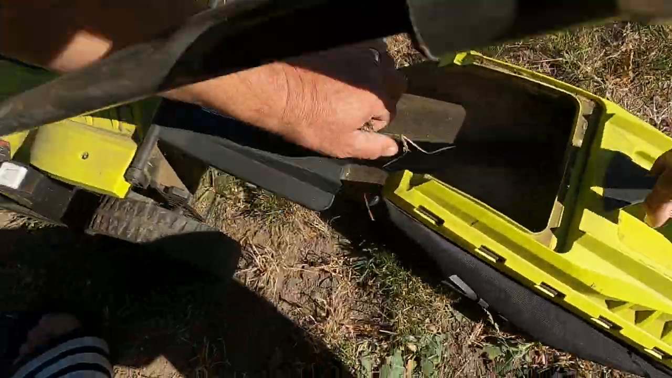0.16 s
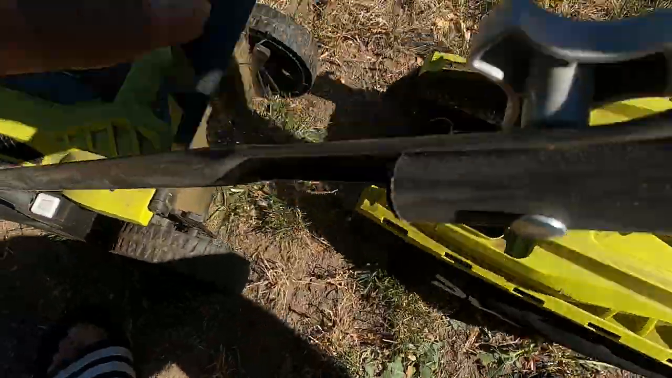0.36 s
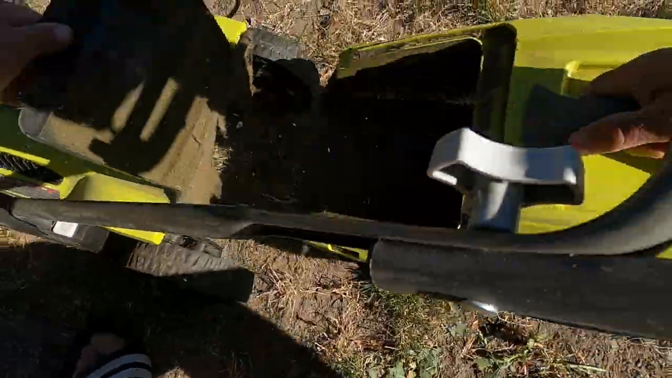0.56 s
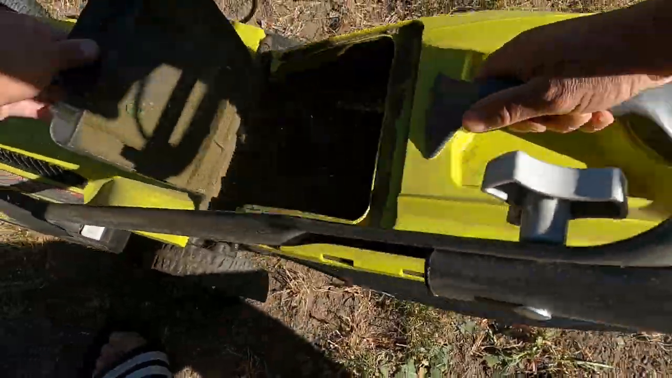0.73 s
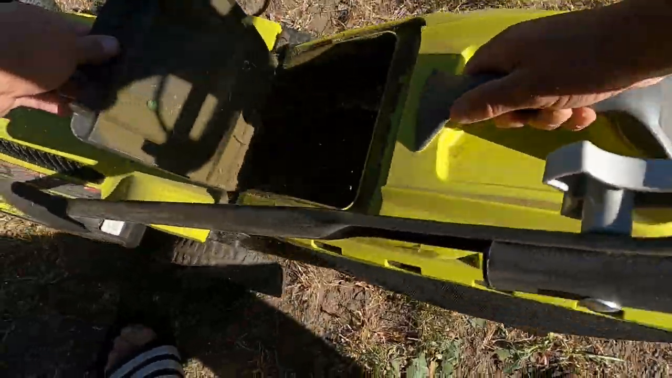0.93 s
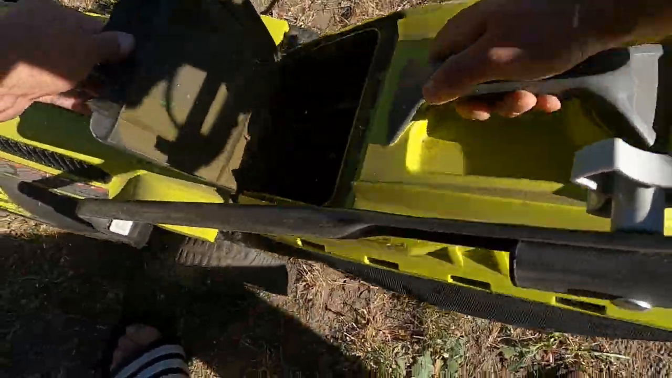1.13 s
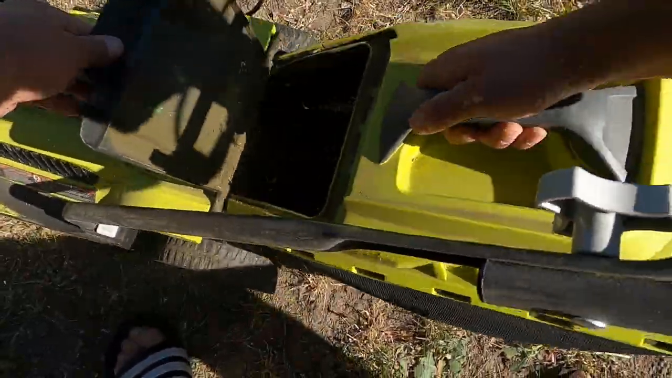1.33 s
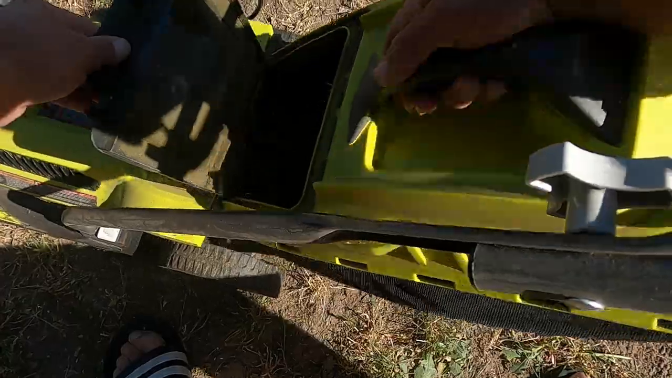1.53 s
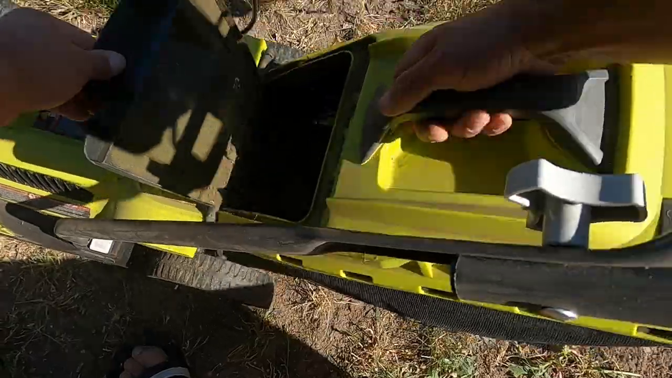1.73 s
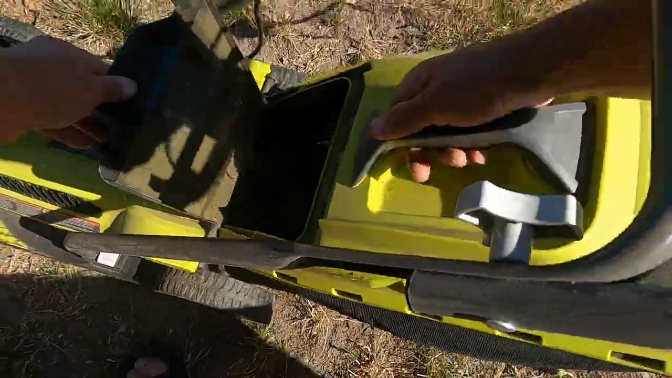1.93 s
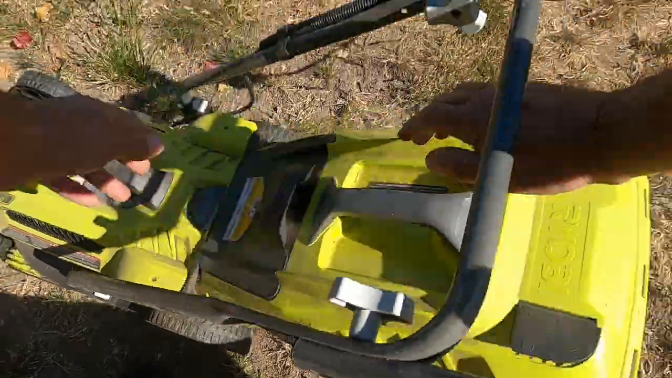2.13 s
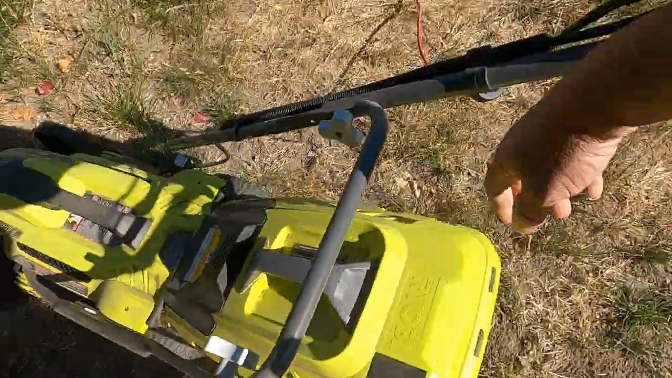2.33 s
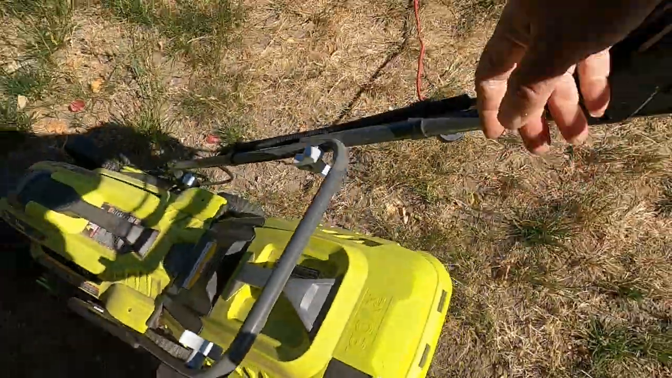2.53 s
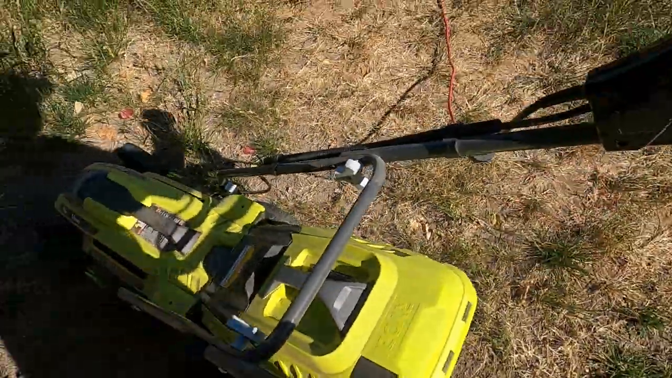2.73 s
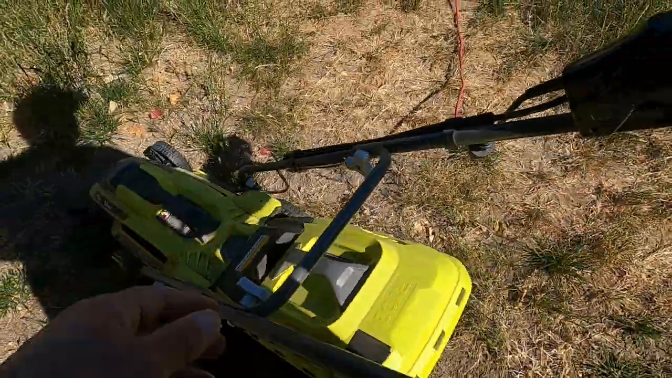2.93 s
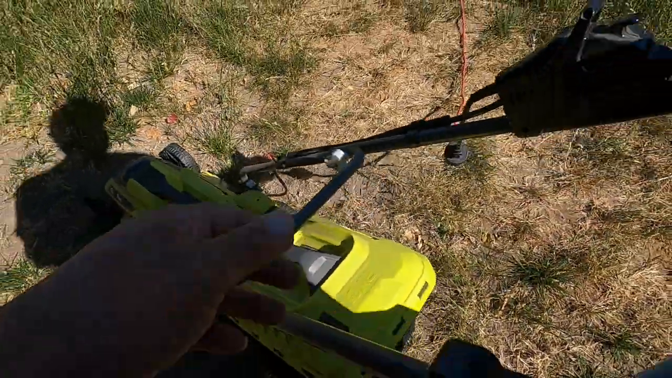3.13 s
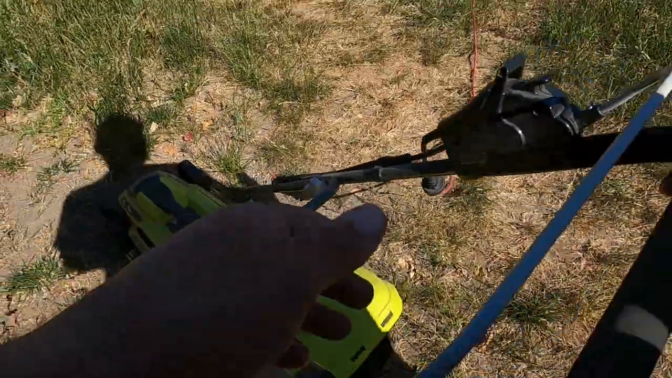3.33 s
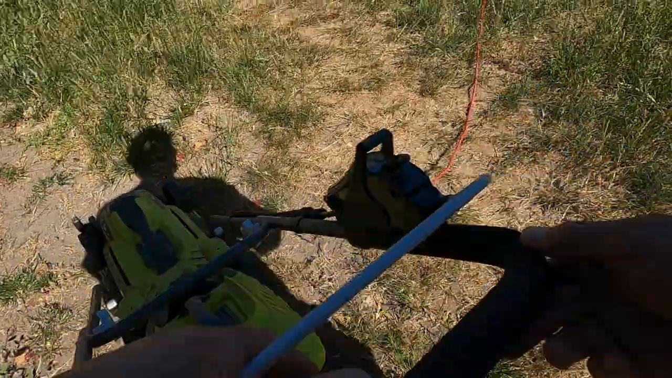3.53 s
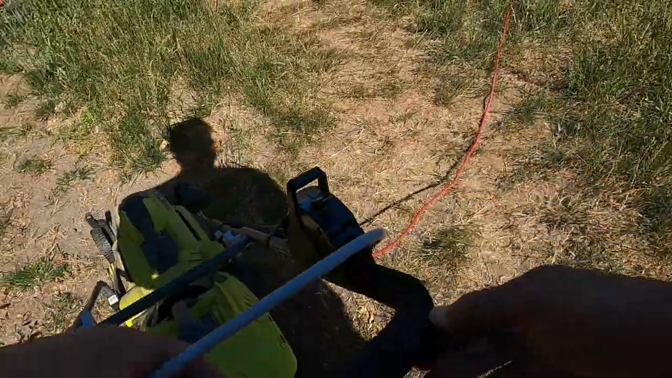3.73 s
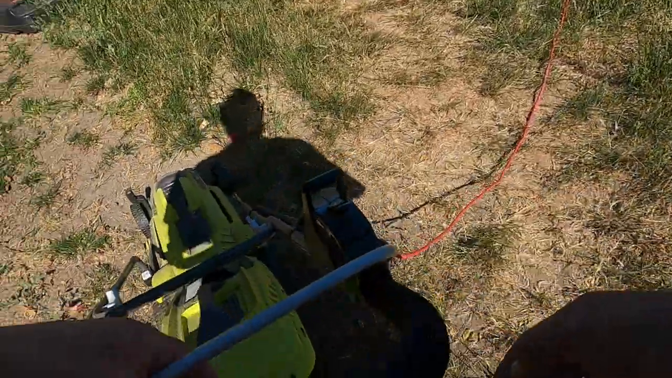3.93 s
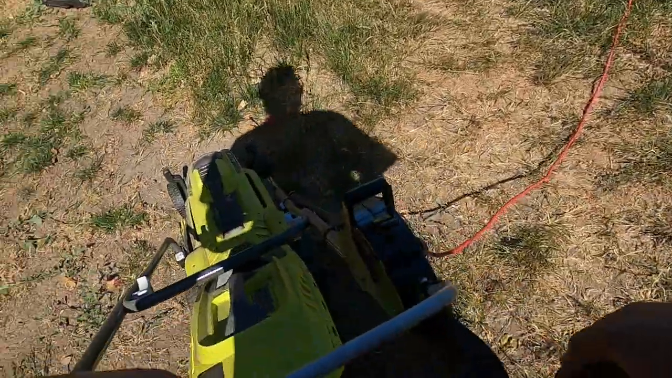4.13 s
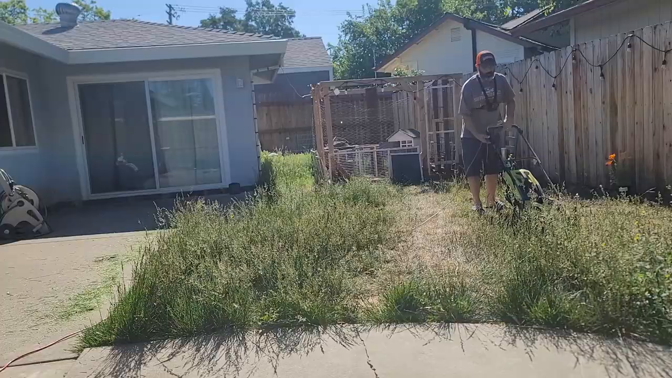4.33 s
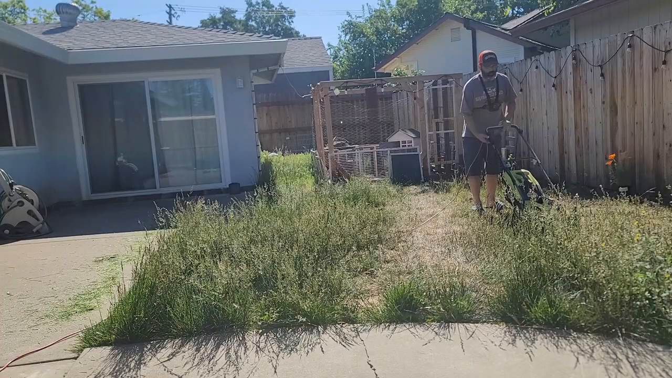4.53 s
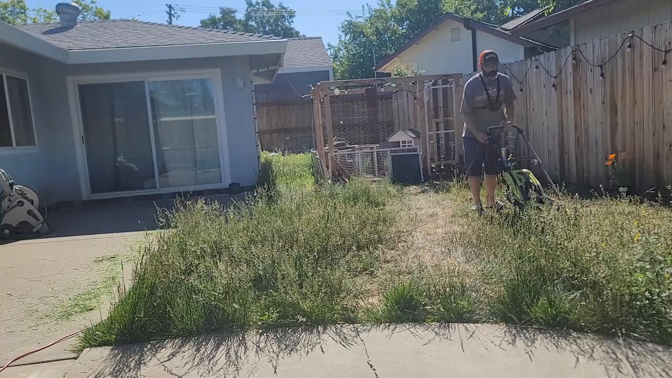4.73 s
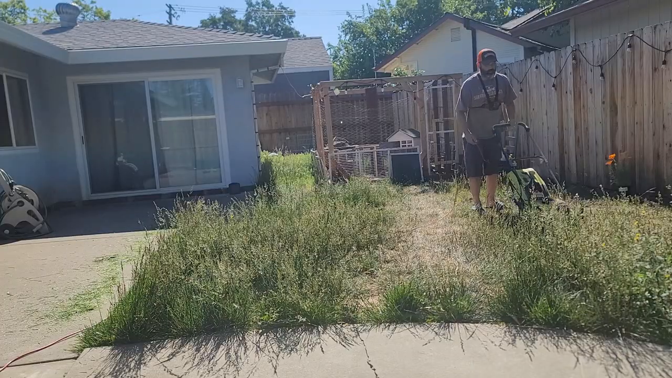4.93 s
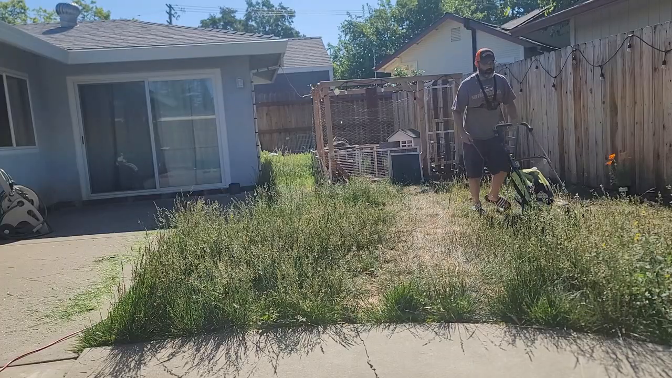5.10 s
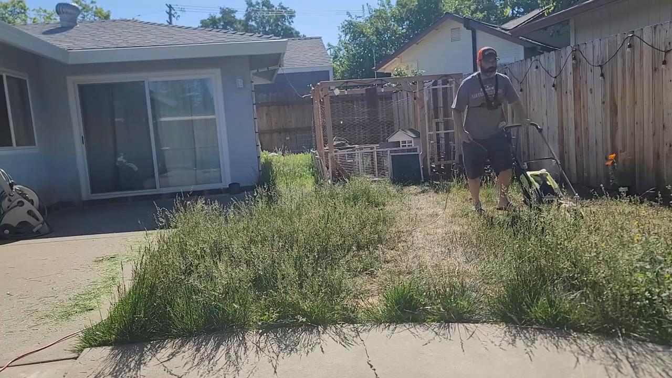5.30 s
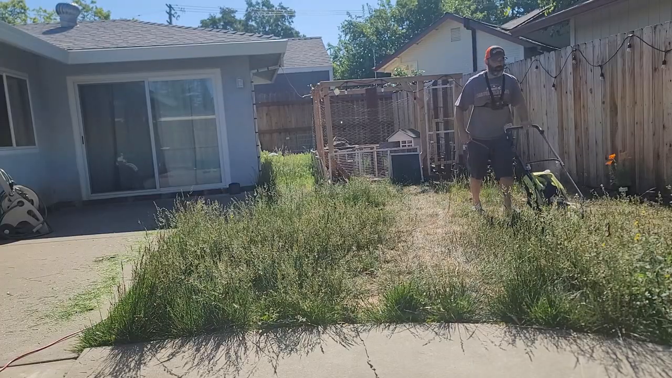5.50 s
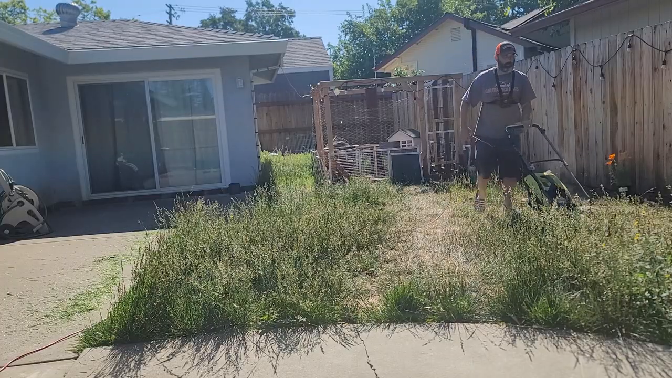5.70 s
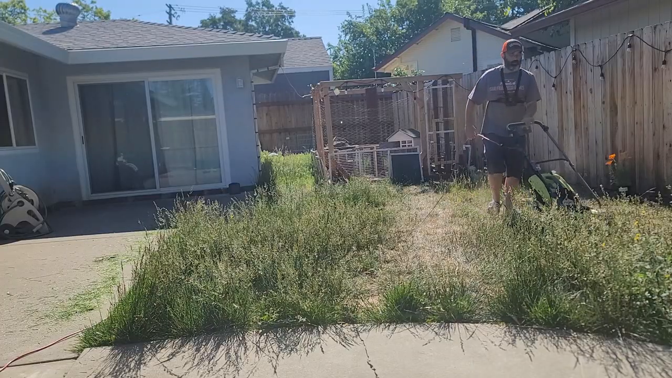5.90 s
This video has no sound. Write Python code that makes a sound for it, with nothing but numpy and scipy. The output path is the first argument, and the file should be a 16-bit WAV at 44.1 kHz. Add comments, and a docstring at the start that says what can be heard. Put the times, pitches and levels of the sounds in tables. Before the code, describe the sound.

A plastic grass catcher rubs, clatters and snaps into place before an electric mower spins up and runs with a rushing hum.

```python
"""In a backyard a hollow plastic grass catcher is dragged over dry grass and knocked into an electric mower:
impacts excite its wall modes, friction rubs and rustles, and moving air and the heaviest knock rumble at the
camera. At 2.2 s the flap squeaks and slaps shut; a hand slides along the handle and pulls the switch. From 4.3
s the motor whines up to speed and the blade hums, pushing air once per pass; at 5.3 s it meets tall grass and
the hiss grows. Throughout, a fence and a house wall weakly reflect the knocks."""
import sys
import numpy as np
from scipy import signal
from scipy.fft import rfft, irfft, next_fast_len
from scipy.io import wavfile
from scipy.ndimage import map_coordinates

SR = 44100
rng = np.random.default_rng(int(sys.argv[2]) if len(sys.argv) > 2 else 0)


def dump_mix(stems):
    """Bounce the given channels to the path in sys.argv[1] as a 16-bit WAV at rate SR."""
    frames = np.atleast_2d(stems).T  # one column per channel
    limited = np.clip(frames, -1, 1)  # hard clip at full scale
    pcm = np.round(limited * 32767).astype(np.int16)
    wavfile.write(sys.argv[1], SR, pcm)


N = 262836
FULL_HZ = 108.8  # blade-passing frequency at full speed

# left-right coherence of near and far sources: f/Hz, coherence (clipped to 0-1 in use)
NEAR = [(60, 0.96), (180, 1), (550, 0.93), (1650, 0.69), (4970, 0.54), (15000, 0.031)]
FAR = [(60, 0.99), (130, 0.95), (290, 0.95), (640, 0.71), (1410, 0.66), (3100, 0.33), (6820, 0.15),
       (15000, -1.4)]


def amp(db):
    """Amplitude ratio of a level."""
    return 10 ** (np.asarray(db) / 20)


def unit(x):
    """Normalisation to rms 1."""
    return x / np.sqrt(np.mean(x ** 2) + 1e-20)


def along(points, hz):
    """Interpolation on a logarithmic frequency axis."""
    f, v = np.transpose(points)
    return np.interp(np.log(hz + 1), np.log(f + 1), v)


def wobble(rate):
    """Smooth random modulation, rate knots a second."""
    return map_coordinates(rng.standard_normal(8192), [np.arange(N) * rate / SR], mode="wrap")


def filtered(x, response):
    """Linear filtering: the spectrum times a frequency response."""
    n = x.shape[-1]
    m = next_fast_len(n + 8192)
    return irfft(rfft(x, m) * response(np.fft.rfftfreq(m, 1 / SR)), m)[..., :n]


def resonances(modes, f):
    """Superposed damped resonators of alternating sign."""
    return sum((-1) ** k * amp(db) * 1j * f * width / (centre ** 2 - f * f + 1j * f * width)
               for k, (centre, width, db) in enumerate(modes))


def spread(pair, coherence):
    """Mid-side mixing gives two independent signals a set coherence."""
    turn = lambda f: np.arccos(np.clip(along(coherence, f), 0, 1)) / 2
    mid, side = filtered(pair, lambda f: np.array([np.cos(turn(f)), np.sin(turn(f))]))
    return np.array([mid + side, mid - side])


def noise(spectrum, coherence, grain_db=0, grain_rate=500):
    """Coloured stereo noise of rms 1, amplitude-modulated into grains."""
    white = rng.standard_normal((2, N)) * amp(grain_db * wobble(grain_rate))
    ends = lambda f: 1 / (1 + (f / spectrum[-1][0] / 2) ** 4) / (1 + (spectrum[0][0] / 2 / (f + 1)) ** 4)
    return unit(spread(filtered(white, lambda f: amp(along(spectrum, f)) * ends(f)), coherence))


def blow(x, db):
    """Equal energy: a transient is scaled to match db held for 10 ms."""
    energy = np.sum(np.atleast_2d(x) ** 2, axis=1).mean()
    return x * amp(db) * np.sqrt(.01 * SR / (energy + 1e-20))


def fade(t, t60):
    """Exponential decay by 60 dB in t60."""
    return np.exp(-np.log(1000) * t / max(t60, 1e-3))


def stroke(start, length, rise, t60):
    """Envelope of a movement: Gaussian rise, hold, exponential decay."""
    t = np.arange(N) / SR - start
    return np.exp(-(np.minimum(t, 0) / rise) ** 2) * fade(np.maximum(t - length, 0), t60)


def add(out, s, sound):
    """Superpose a short sound on out at s seconds."""
    part = out[:, max(0, round(s * SR)):][:, :sound.shape[-1]]
    part += sound[..., :part.shape[1]]


def background(drone_hz=539):
    """Ambient noise: quiet outdoor air, joined by a faint far-off drone."""
    # outdoor air spectrum: f/Hz, relative level/dB
    air = [(15, -26), (25, -2), (158, -5), (415, -16), (529, -12.5), (588, -17), (2560, -26.5), (8780, -80),
           (15000, -80)]
    t = np.arange(N) / SR
    drone = np.sin(2 * np.pi * drone_hz * t + .5 * wobble(12)) * np.interp(t, [3.45, 3.7], [0, 1])
    return amp(-47.5) * noise(air, NEAR) + amp(-53) * drone


def handling(rest_db=-64):
    """Friction noise: the box rubs and scrapes, dry stalks crackle and palms brush the handle."""
    # pushes of the catcher: t/s, duration/s, relative rub level/dB, relative rustle level/dB
    slides = [(0, 0.43, -43, -53), (0.357, .03, -35.5, -47), (.415, 0.024, -36.5, -42),
              (0.473, .12, -32.5, -48.5), (0.864, 0.19, -35.5, -60.5), (1.097, 0.092, -32.5, -53),
              (1.314, 0.052, -33, -54.5), (1.552, 0.02, -31, -48.5), (1.675, 0.14, -37.5, -56.5),
              (2.027, 0.32, -39, -51)]
    # palm strokes: t/s, duration/s, relative level/dB
    brushes = [(2.884, 0.01, -52), (2.961, .01, -53), (3.055, 0.12, -52.5), (3.478, 0.07, -50.5),
               (3.656, 0.1, -55), (4.094, 0.027, -40.5)]
    # spectra of the hollow box and dry grass: f/Hz, relative level/dB
    hollow = [(70, -10.5), (160, -7), (350, -5.5), (500, -10), (700, -20), (1200, -27.5)]
    straw = [(650, 5), (1300, 4), (2200, 0), (3300, -2.5), (5000, -4), (8500, -10.5), (12000, -21.5),
             (16000, -32.5)]
    # resonances of plastic scraping on plastic: f/Hz, bandwidth/Hz, gain/dB
    edge_modes = [(917, 160, 2.5), (2520, 130, -10), (2700, 220, 3), (3570, 400, 4.5)]
    rubbing, sliding, brushing = 0, 0, amp(rest_db)
    for start, length, rub_db, rustle_db in slides:
        push = stroke(start, length, rise=.03, t60=.56)
        rubbing = np.maximum(rubbing, amp(rub_db) * push)
        sliding = np.maximum(sliding, amp(rustle_db) * push)
    for start, length, rustle_db in brushes:
        brushing = np.maximum(brushing, amp(rustle_db) * stroke(start, length, rise=.03, t60=.22))
    rub = amp(-1) * noise(hollow, NEAR, grain_db=2.5, grain_rate=120)
    friction = noise(straw, NEAR, grain_db=5, grain_rate=150)
    scrape = amp(2) * unit(filtered(friction, lambda f: resonances(edge_modes, f)))
    brush = amp(2) * noise(straw, NEAR, grain_db=1.5, grain_rate=250)
    crackle = amp(-2) * noise(straw[2:], NEAR, grain_db=8, grain_rate=500)
    return rubbing * rub + sliding * scrape + np.maximum(sliding, brushing) * (brush + crackle)


def buffet():
    """Low rumbles reach the two microphone ports unequally: pressure fluctuations of moving air, and the low
    thump of the heavy knock at 0.82 s."""
    # low rumbles at the ports (moving air; at 0.824 s the knock's low thump): t/s, duration/s, relative
    # level/dB, left minus right/dB
    rumbles = [(0, 0.5, -47, -1), (0.824, 0.043, -25, -0.5), (1.1, 0.08, -29, -1), (1.554, .07, -35, 0),
               (2.246, 0.21, -38.5, -22), (2.515, 0.34, -45, 10.5), (3.599, 0.029, -28.5, -17)]
    gusts = sum(amp(db + np.array([[pan_db], [-pan_db]]) / 2) * stroke(start, length, rise=.018, t60=.43)
                for start, length, db, pan_db in rumbles)
    spectrum = [(18, -4), (35, 0), (70, 0), (120, -9), (200, -26), (400, -50)]  # f/Hz, level/dB
    rumble = noise(spectrum, coherence=[(30, .8), (100, .95)], grain_db=2.5, grain_rate=25)
    return amp(-3) * gusts * rumble


def thud(db, spot_hz, t60, spot_octaves=0.77, attack_s=0.0017, scatter_db=2, detune=0.043):
    """Modal vibration: the struck spot favours wall modes near one pitch, and low modes ring longer."""
    # wall modes of catcher and deck: f/Hz, relative level/dB
    walls = [(72, 0), (102, 2), (155, -1.5), (205, -4.5), (258, -1.5), (315, -5.5), (385, -2.5), (460, 2),
             (560, -3)]
    t = np.arange(SR // 3) / SR
    wall_hz, wall_db = np.transpose(walls)
    weights = amp(wall_db + rng.normal(0, scatter_db, len(walls)))
    weights *= np.exp(-.5 * (np.log2(wall_hz / spot_hz) / spot_octaves) ** 2)
    weights *= rng.choice([-1, 1], len(walls))
    pitch = wall_hz[:, None] * np.exp(rng.normal(0, detune, (len(walls), 1)))
    modes = np.sin(2 * np.pi * pitch * t) * fade(t * (pitch / spot_hz) ** .11, t60)
    return blow(weights @ modes * (1 - np.exp(-t / attack_s)), db)


def clack(rim_db, latch_db, t60, rise_s=0.00048):
    """Forced resonance: the chatter of a hard contact drives rim and latch."""
    # resonances of rim, flap and latch: f/Hz, bandwidth/Hz, gain/dB
    rim_modes = [(620, 69, -5.5), (753, 83, 0), (1000, 98, 2), (1394, 220, -2), (1840, 270, -15),
                 (2620, 77, -5.5)]
    latch_modes = [(2570, 870, 5), (3730, 264, 4.5), (4180, 310, 3.5), (5640, 2600, -1.5), (6320, 1200, 0),
                   (9070, 620, -18)]
    t = np.arange(SR // 8) / SR
    contact = spread(rng.standard_normal((2, len(t))), NEAR) * fade(t, t60) * (1 - np.exp(-t / rise_s))
    rim = filtered(contact, lambda f: resonances(rim_modes, f))
    latch = filtered(contact, lambda f: resonances(latch_modes, f))
    return blow(rim, rim_db) + blow(latch, latch_db)


def knocks():
    """Impact excitation: a knock swings the walls and chatters, longer if loose; a click only chatters."""
    # knocks on the body: t/s, thud level/dB, spot f/Hz, t60/s, rim level/dB, latch level/dB
    impacts = [(.002, -23, 270, 0.073, -42.5, -43), (.127, -36.5, 259, 0.047, -39, -42),
               (0.21, -33.5, 252, 0.047, -36.5, -46), (.283, -30.5, 304, 0.18, -55, -46),
               (.366, -29, 276, 0.06, -51, -41), (0.567, -40, 201, 0.17, -34.5, -39.5),
               (.814, -16.5, 347, 0.082, -23, -25.5), (0.821, -9.5, 275, 0.073, -31, -47),
               (0.869, -21.5, 280, 0.26, -28.5, -39), (0.888, -15.5, 370, 0.064, -31, -31.5),
               (.896, -14, 176, 0.21, -22.5, -34), (1.088, -20, 189, 0.031, -38, -59.5),
               (1.117, -18, 263, 0.071, -24.5, -39.5), (1.134, -23, 220, 0.051, -29.5, -36),
               (1.194, -22, 242, 0.12, -45, -43), (1.322, -22.5, 352, 0.1, -45, -56),
               (1.359, -22, 340, 0.013, -26.5, -35.5), (1.382, -27, 290, 0.04, -34.5, -41),
               (1.55, -22, 188, 0.079, -41, -40), (1.572, -23, 173, 0.054, -30, -29.5),
               (1.794, -15, 360, 0.013, -25, -28), (1.841, -21.5, 307, 0.018, -29, -38),
               (2.038, -27.5, 337, .04, -75, -51), (2.175, -22.5, 246, 0.16, -36.5, -47),
               (2.1969, -12, 216, 0.024, -13, -11.5), (2.205, -12.5, 194, 0.072, -40, -45),
               (2.235, -17.5, 127, 0.27, -39.5, -49), (3.651, -28, 165, 0.27, -40, -65),
               (4.3, -26.5, 231, 0.18, -49, -43), (4.327, -24, 337, 0.33, -37, -35.5)]
    # clicks of catches, lever, switch and grit: t/s, rim level/dB, latch level/dB
    clicks = [(.072, -48, -45), (1.912, -42, -60), (1.988, -46, -38), (2.159, -42, -32), (2.334, -38, -64),
              (2.514, -37, -30), (3.059, -40, -47), (4.091, -43, -33.5), (4.404, -34, -29.5),
              (4.589, -24, -25.5), (5.041, -25, -26)]
    out = np.zeros((2, N))
    for s, thud_db, spot_hz, t60, rim_db, latch_db in impacts:
        add(out, s, thud(thud_db, spot_hz, t60))
        add(out, s, clack(rim_db, latch_db, t60=.13 * t60 ** .47))
    for s, rim_db, latch_db in clicks:
        add(out, s, clack(rim_db, latch_db, t60=.026))
    return out


def yard(x, t60=0.2):
    """Reflection from fence and house wall: convolution with a short, dull tail."""
    t = np.arange(SR // 3) / SR
    reflections = rng.standard_normal((2, len(t))) * fade(t, t60) * (t > .008)
    tail = filtered(reflections, lambda f: 1 / (1 + f / 2500))
    return signal.fftconvolve(x, tail / np.linalg.norm(tail[0]), axes=1)[:, :N]


def ticks(t60=0.038):
    """Brittle fracture: stalks and grit break with a short bright snap."""
    # snaps: t/s, level/dB
    snaps = [(0.144, -39), (4.233, -51.5), (4.372, -46.5), (4.665, -39.5), (5.43, -36.5), (5.942, -30)]
    # their resonances: f/Hz, bandwidth/Hz, gain/dB
    ring = [(4200, 3000, -3), (9000, 1200, 0), (14000, 2000, -14)]
    out, t = np.zeros((2, N)), np.arange(SR // 20) / SR
    for s, db in snaps:
        burst = rng.standard_normal((2, len(t))) * fade(t, t60)
        crack = filtered(burst, lambda f: resonances(ring, f))
        add(out, s, blow(spread(crack, NEAR), db))
    return out


def squeak(at_s=2.16, level_db=-39, pitch_hz=2000, glide_per_s=6):
    """Sliding friction: the flap's edge slips along the rim with a rising squeak before it shuts."""
    t = np.arange(N) / SR - at_s
    phase = 2 * np.pi * pitch_hz * (t + glide_per_s * t ** 2 / 2) + .6 * wobble(400)
    return amp(level_db) * np.exp(-(t / .011) ** 2) * (np.sin(phase) + .5 * np.sin(2 * phase))


def motor(blade_hz, slip, passes, screech_hz=57, screech_width_hz=9.5):
    """Rotational orders: ragged motor and fan tones, loudest under strain, screeching at half speed."""
    # tones: multiple of the blade rate, relative level/dB, gain at full strain/dB
    orders = [(44, -31, 30), (46, -23, 31), (48.5, -33, 26), (52, -29, 15), (62.5, -21.5, 12),
              (69, -33, 24), (92, -46, 39)]
    screech = np.exp(-((blade_hz - screech_hz) / screech_width_hz) ** 4)
    strain = np.minimum(1.45 * slip, .69) + .32 * screech
    whine = 0
    for order, db, strain_db in orders:
        blur = (.85 + .75 * strain) * wobble(220) + .6 * np.array([wobble(40), wobble(40)])
        level_db = db + strain_db * strain + 3 * wobble(70) + 2 * wobble(15)
        whine = whine + amp(level_db) * np.sin(2 * np.pi * order * passes + blur)
    # near full speed the cooling air whistles in a vent
    whistle = noise([(3400, -45), (3730, -16), (3785, 0), (3840, -16), (4200, -45)], FAR)
    return whine + amp(-12) * whistle * np.clip((blade_hz - 96) / 5, 0, 1)


def blade(angle, blade_hz, in_grass_s, rush_db, deck_hz=268.5, deck_width_hz=28):
    """Blade-passing harmonics: four strong ones boom on crossing the deck resonance; weaker ones waver."""
    # harmonics 1-4: relative level/dB
    hum_db = [-20.5, -21.5, -25.5, -26]
    hum, upper = 0, 0
    for k, db in enumerate(hum_db, 1):
        boom_db = 7.5 * np.exp(-((k * blade_hz - deck_hz) / deck_width_hz) ** 2)
        hum += amp(db + boom_db + 2.5 * wobble(9)) * np.sin(k * angle + rng.uniform(0, 2 * np.pi))
    for k in range(5, 15):
        level_db = -5 * np.log2(k / 5) + 4.5 * wobble(8.7)
        upper += amp(level_db) * np.sin(k * angle + .52 * wobble(16))
    hum_gain = (blade_hz / FULL_HZ) ** 1.47 * amp(-3 * in_grass_s)  # grows with speed, thins in grass
    return hum_gain * hum + amp(rush_db - 12) * upper


def mower(start_s=4.301, spin_up_s=.31, draught_rise_s=.061, tall_grass_s=5.3):
    """Turbulence: as the blade runs up, its draught through the deck grows with speed and grass."""
    # low, middle and high spectra of the draught: f/Hz, relative level/dB
    roar_spectrum = [(26, -43), (45, -11.5), (103, -7.5), (162, -8.5), (210, -3.5), (247, -6.5), (314, 2),
                     (360, -3), (900, -12.5), (1170, -16), (1980, -120)]
    rush_spectrum = [(320, -9.5), (550, -9.5), (759, -7.5), (864, -5), (1220, -0.5), (1850, -5.5),
                     (2760, -12), (3350, -9), (3810, -7.5), (4060, -10.5), (6300, -17), (7940, -28),
                     (12000, -32.5), (15600, -64), (22000, -120)]
    hiss_spectrum = [(8000, -2), (11000, -9.5), (15000, 2.5), (16000, -11)]
    t = np.arange(N) / SR
    running_s = np.maximum(t - start_s, 0)
    in_grass_s = np.maximum(t - tall_grass_s, 0)
    slip = np.exp(-running_s / spin_up_s)  # share of full speed still missing
    blade_hz = FULL_HZ * (1 - slip)
    passes = np.cumsum(blade_hz) / SR
    # uneven grass loads the blade, which blurs its upper harmonics
    angle = 2 * np.pi * passes + .011 * (2 * wobble(14) + wobble(45))
    swell = unit(1 + .11 * np.cos(angle))  # turbulence swells at each pass
    roar_db = -23 - 14.2 * slip + .5 * in_grass_s
    rush_db = -25.5 - 11.1 * slip + 2.5 * in_grass_s
    hiss_db = -47 - 14 * slip + 17.4 * in_grass_s
    roar = amp(roar_db) * noise(roar_spectrum, FAR)
    rush = amp(rush_db) * swell * noise(rush_spectrum, FAR, grain_db=1.06, grain_rate=200)
    hiss = amp(hiss_db) * swell * noise(hiss_spectrum, FAR, grain_db=2, grain_rate=700)
    tones = blade(angle, blade_hz, in_grass_s, rush_db) + amp(rush_db) * motor(blade_hz, slip, passes)
    onset = 1 - np.exp(-(running_s / draught_rise_s) ** 2)
    return roar * (running_s > 0) + (tones + rush + hiss) * onset


def scene(lag_s=3.5e-5):
    """Superposition of all sources; the close handling reaches the right port lag_s before the left."""
    plastic = knocks() + squeak()
    port_delay = lambda f: np.exp(1j * np.pi * f * lag_s * np.array([[-1], [1]]))
    close = filtered(plastic + handling(), port_delay)
    return close + amp(-32.5) * yard(plastic) + ticks() + buffet() + mower() + background()


def record(dry, top_hz=15950):
    """Soft saturation and band limiting: the camera rounds off peaks and cuts the highest treble."""
    rounded = dry / (1 + np.abs(dry) ** 6) ** (1 / 6)
    return filtered(rounded, lambda f: f < top_hz)


dry = scene()
out = record(dry)
dump_mix(out)
```